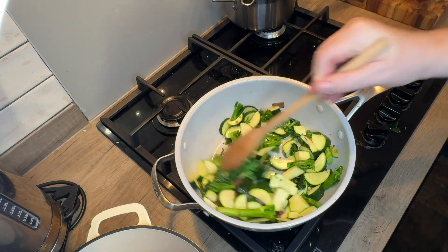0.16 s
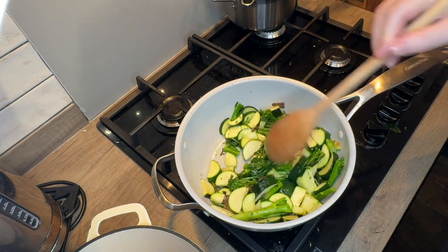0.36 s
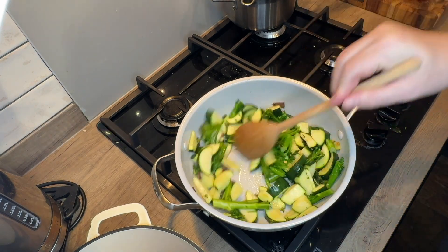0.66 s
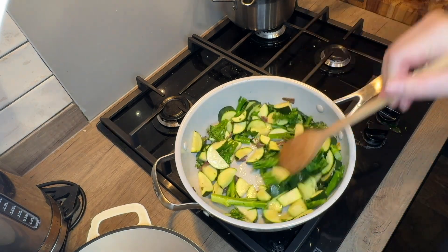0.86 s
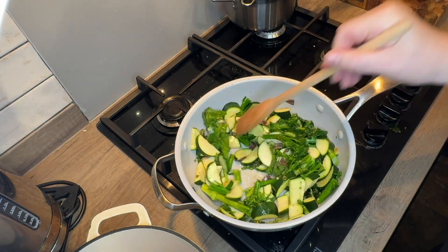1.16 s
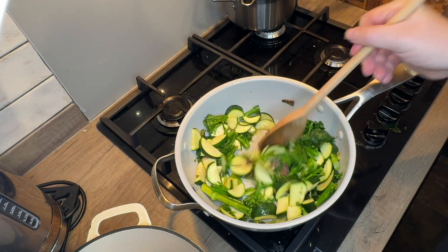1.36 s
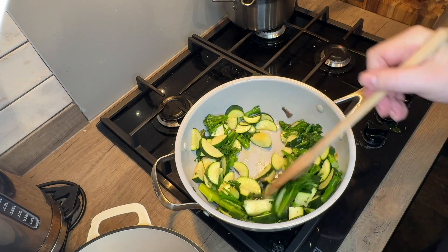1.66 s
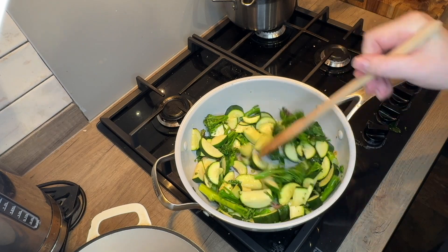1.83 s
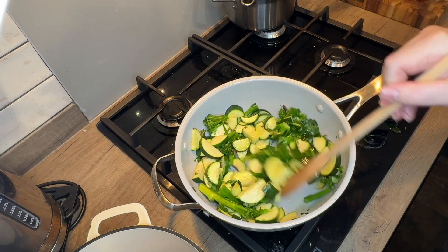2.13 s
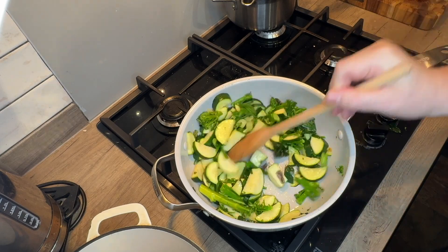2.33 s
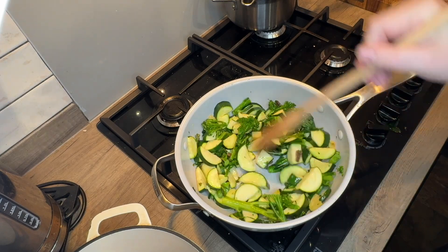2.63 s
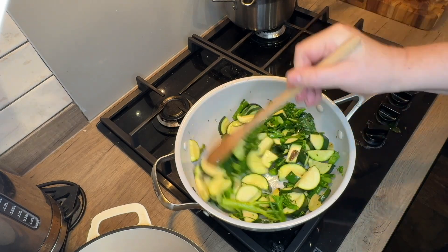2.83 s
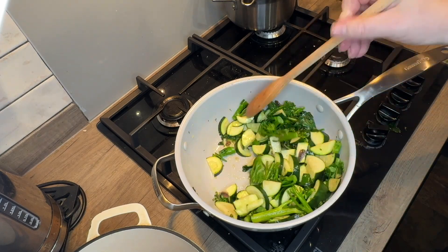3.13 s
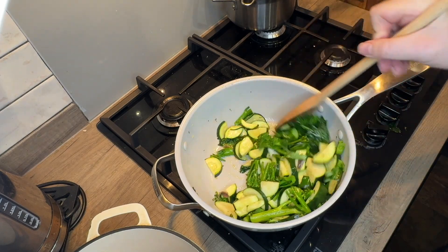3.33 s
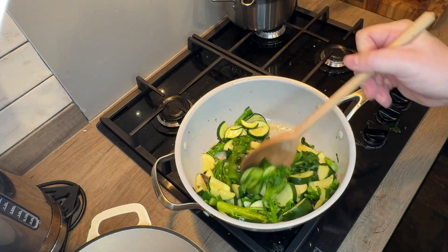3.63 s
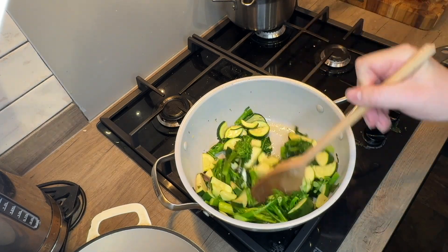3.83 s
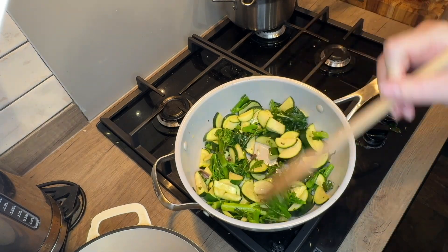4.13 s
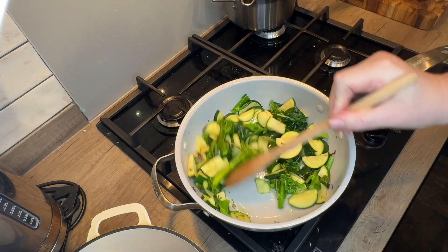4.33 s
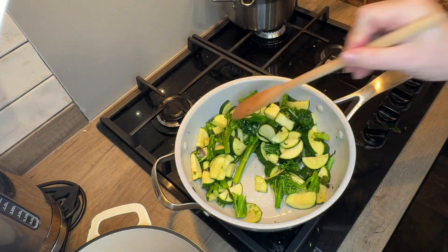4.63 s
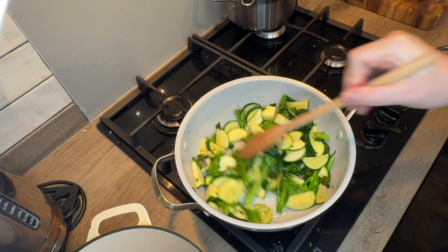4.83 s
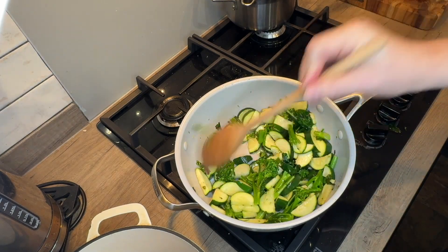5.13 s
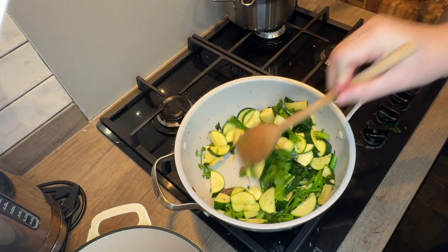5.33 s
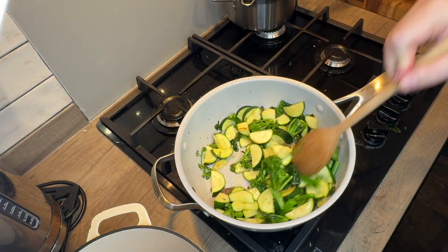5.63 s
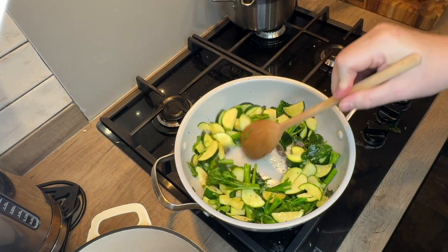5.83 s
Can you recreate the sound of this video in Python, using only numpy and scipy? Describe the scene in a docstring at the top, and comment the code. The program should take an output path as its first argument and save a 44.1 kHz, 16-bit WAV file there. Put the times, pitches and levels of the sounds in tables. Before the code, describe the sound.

A wooden spoon stirs chopped vegetables in a frying pan on a stove. Irregular hollow knocks, the strongest near one second, three seconds and just before six, mix with soft touches and small rattles. Wet pieces rustle and sizzle quietly throughout, with a few dry crackles. A low motor hum lies behind. Small hard-surfaced kitchen, short echo, close mono pickup, with steady noise held down and tails cut short.

```python
"""A wooden spoon knocks on a frying pan as it stirs chopped vegetables on a gas hob, in a small kitchen.
Knocks, soft low touches and rattles, the low ring of the bowl and the bumps on the grate are damped modes
driven by short forces. Between them the vegetables rustle and sizzle softly, as showers of tiny clicks, with
a few sharp crackles of dying noise. An appliance hums behind, two wavering sines over rumble and air.
The recorder turns down whatever stays near the steady noise and cuts the top."""
import sys
import numpy as np
from scipy import signal
from scipy.io import wavfile
from scipy.ndimage import uniform_filter1d

SR = 44100
rng = np.random.default_rng(int(sys.argv[2]) if len(sys.argv) > 2 else 0)


def bounce(signal):
    """Save signal as a 16-bit WAV file at the path given by the first command-line argument."""
    frames = np.transpose(np.atleast_2d(signal))
    limited = np.clip(frames, -1, 1)
    pcm = np.round(limited * 32767).astype(np.int16)
    wavfile.write(sys.argv[1], SR, pcm)


N = 263575
TIME = np.arange(N) / SR
HIT_TIME = TIME[:SR // 2]

# Blows of the spoon on the pan; vegetables caught under it cushion the contact and lower its cut-off.
# Each row: contact in seconds, relative strength in dB, contact cut-off in Hz, low knock and wall of the pan
# in dB re strength, favoured base pitch and tick pitch in Hz, tail in dB re the direct sound.
SPOON_BLOWS = [ (0.144, -52, 8000, -6, -4, 763, 3530, -4),
               (0.1467, -55.5, 9000, -24, -26, 800, 6400, -12.5),
               (0.968, -31, 1273, -12, -5, 850, 3000, -5.5), (2.1404, -35, 1080, 5, 9, 790, 3420, -1),
               (2.786, -46.5, 2980, 13, -34, 704, 4100, -2),
               (2.8905, -48, 4960, 2.5, -6.5, 726, 3400, -8.5), (3.174, -39.5, 8000, 6, 5.5, 920, 3930, -1),
               (3.179, -54.5, 5500, -20, 17, 750, 7040, 0.5), (3.3971, -43, 550, 9, -1.5, 766, 3200, -3.5),
               (3.8287, -49, 3670, 17, 0, 770, 4600, -1.5), (4.212, -37, 4400, 0, 1.5, 700, 3500, -0.5),
               (4.823, -60, 4500, 3, 4.5, 810, 3400, 2.5), (5.7327, -29, 1623, -11, -2, 849, 3530, -2.5)]
# Modes of spoon and pan, from low knock to wall. Each row: pitch in Hz, relative level in dB, t60 in seconds.
LOW_MODES = [(333, -12, 0.065), (369, -1, 0.013), (480, -4, 0.07), (532.5, 1.5, 0.026), (670, 7.5, 0.032)]
FLOOR_MODES = [(751.4, 1, 0.17), (794, 4, 0.022), (932, 3.1, 0.074)]
SIDE_MODES = [(1080, 3.5, 0.014), (1256, 4.5, 0.033), (1397, 2, 0.036), (1595, 4.5, 0.0065)]


def knocks(level_db=-1, graze_db=-33, graze_s=0.0038, delay_s=0.00037):
    """Each blow is a graze through the vegetables, a push, a brief skid of the wood and a dying tail."""
    # Bright modes of the contact. Each row: pitch in Hz, relative level in dB, t60 in seconds.
    clack_modes = [(1780, 6, 0.031), (2008.4, 6.5, 0.028), (2090, 5, 0.032), (2320, -0.5, 0.045),
                   (2620, -8, 0.022)]
    tick_modes = [(2945, 13.5, 0.011), (3320, 5.5, 0.033), (3430, 8.5, 0.013), (3810, 3, 0.0091),
                  (4034, 2, 0.031), (4720, 9, 0.013), (4650, 1, 0.01), (5960, 6.5, 0.019),
                  (6880, -5, 0.0026)]
    # how sharply the strike point picks out modes, in dB per squared octave
    base_focus_db, clack_focus_db, tick_focus_db = 110, 42, 75
    highest_clack_hz, clack_per_cutoff = 2500, 1.92
    bright_tick_db, focus_db_per_db, max_narrowing = -33, 2.1, 3.6
    out = np.zeros(N)
    for s, strength_db, contact_hz, knock_db, wall_db, base_hz, tick_hz, tail_db in SPOON_BLOWS:
        force = push(skid_db=-13.5, skid_t60=0.032)
        clack_db, tick_db = clack_and_tick(strength_db, contact_hz)
        # a cushioned blow clacks lower
        clack_hz = min(highest_clack_hz, clack_per_cutoff * contact_hz)
        # a dull contact favours few tick modes, a bright contact wakes more of them
        narrowing = min(from_db(focus_db_per_db * (bright_tick_db - tick_db)), max_narrowing)
        families = [
            (strength_db + knock_db, LOW_MODES),
            (strength_db, struck(FLOOR_MODES, base_hz, base_focus_db)),
            (strength_db + wall_db, SIDE_MODES),
            (clack_db, struck(clack_modes, clack_hz, clack_focus_db)),
            (tick_db, struck(tick_modes, tick_hz, tick_focus_db * narrowing))]
        for db, modes in families:
            direct = sounded(force, modes)
            gain = from_db(db + level_db) / attack_rms(direct)
            tail = from_db(tail_db) * kitchen(modes)
            add(out, s - graze_s, gain * from_db(graze_db) * direct)
            add(out, s + delay_s, gain * (direct + tail))
    return out


def touches_and_rattles(level_db=-1, tail_db=-9, focus_db=70):
    """Soft low touches, small rattles and short rings of the pan, each near one pitch."""
    # Each row: start in seconds, relative level in dB, favoured pitch in Hz.
    small_sounds = [(0.639, -52.5, 960), (1.735, -50.5, 435), (1.737, -53.5, 895), (1.853, -53, 913),
                    (2.841, -39, 723), (2.911, -44.5, 750), (3.291, -49.5, 1340), (3.387, -51, 700),
                    (3.496, -45.5, 910), (4.362, -52.5, 806), (4.724, -54.5, 1120), (4.858, -50, 810),
                    (5.338, -59, 334)]
    out = np.zeros(N)
    for s, db, hz in small_sounds:
        modes = struck(LOW_MODES + FLOOR_MODES + SIDE_MODES, hz, focus_db)
        direct = sounded(push(skid_db=-15.5, skid_t60=0.052), modes)
        gain = from_db(db + level_db) / attack_rms(direct)
        tail = from_db(tail_db) * kitchen(modes)
        add(out, s, gain * (direct + tail))
    return out


def bowl(ring_db=-21, follows_tick=0.58, follows_knock=0.26, lag_s=0.02194):
    """Just after each knock the bowl of the pan rings low, the more so the harder and heavier the contact."""
    # Low ring of the whole pan. Each row: pitch in Hz, relative level in dB, t60 in seconds.
    bowl_mode = [(311, 0, 0.52)]
    out = np.zeros(N)
    for s, strength_db, contact_hz, knock_db, *_ in SPOON_BLOWS:
        tick_db = clack_and_tick(strength_db, contact_hz)[1]
        db = ring_db + follows_tick * tick_db + follows_knock * (strength_db + knock_db)
        tone = band(ring(push(skid_db=-9, skid_t60=0.042), bowl_mode), 250, 299)
        add(out, s + lag_s, from_db(db) * peak_one(tone))
    return out


def bumps():
    """The pan bumps on its grate, and the low modes of the grate answer the shove with a soft thud."""
    # Each row: start in seconds, relative peak in dB.
    shoves = [(0.17, -48), (2.193, -46.5), (2.224, -53), (2.817, -49.5), (2.895, -48), (3.194, -48.5)]
    # Each row: pitch in Hz, relative level in dB, t60 in seconds.
    grate_modes = [(60, -4, 0.1), (107, 5, 0.29), (159, -3, 0.12), (220, 4, 0.09)]
    out = np.zeros(N)
    for s, thud_db in shoves:
        thud = band(ring(push(skid_db=-11.5, skid_t60=0.024), grate_modes), 26, 210)
        add(out, s, from_db(thud_db) * peak_one(thud))
    return out


def push(skid_db, skid_t60):
    """The force of a contact: a sharp push and a brief skid."""
    force = from_db(skid_db) * fading_noise(skid_t60)
    force[0] += 1
    return force


def clack_and_tick(strength_db, contact_hz, cushion_db_per_octave=21.5):
    """Relative dB of the two bright families; the cushion takes away what lies above its cut-off."""
    bare_db = np.array([13, 7.5])  # clack and tick of a bare contact, re strength
    centres_hz = np.array([2270, 3670])
    octaves = np.log2(centres_hz / contact_hz)
    cushion_db = 10 * np.log10(1 + from_db(cushion_db_per_octave * octaves) ** 2)
    return strength_db + bare_db - cushion_db


def struck(modes, lead_hz, focus_db):
    """Modes lose focus_db times the squared octaves from the favoured pitch."""
    return [(hz, db - focus_db * np.log2(hz / lead_hz) ** 2, t60) for hz, db, t60 in modes]


def ring(force, modes):
    """Damped sines in parallel, driven by a force; neighbours swing in opposite senses."""
    out = 0
    for k, (hz, db, t60) in enumerate(modes):
        r = from_db(-60 / (t60 * SR))  # decay per sample
        w = 2 * np.pi * hz / SR
        swing = signal.lfilter([0, np.sin(w)], [1, -2 * r * np.cos(w), r * r], force + 1e-18)
        out = out + (-1) ** k * from_db(db) * swing
    return out


def sounded(force, modes, skirt=1.253):
    """A family of modes under a force, with dark valleys on both sides; unit energy."""
    sound = band(ring(force, modes), modes[0][0] / skirt, modes[-1][0] * skirt, order=4)
    return sound / np.linalg.norm(sound)


def kitchen(modes, first_echo_s=0.0023, build_s=0.0014, blur_cycles=30):
    """The pan rattles on and the tiles echo it: a dense tail in which high modes blur together."""
    # Rattle and echo. Each row: pitch in Hz, tail level in dB, t60 in seconds.
    room = [(440, 0, 0.46), (910, 3, 0.35), (1250, 2.5, 0.39), (2260, -2.5, 0.26), (4500, 0.5, 0.23)]
    hz = np.sqrt(modes[0][0] * modes[-1][0])
    build = np.clip((HIT_TIME - first_echo_s) / build_s, 0, 1)
    echoes = fading_noise(at_hz(room, hz, axis=2)) * build
    blurred = [(mode_hz, db, min(t60, blur_cycles / mode_hz)) for mode_hz, db, t60 in modes]
    return from_db(at_hz(room, hz)) * sounded(echoes, blurred)


def crackles(level_db=4, spray_db=8):
    """Stalks and hot oil crackle: a snap and a short spray, both dying noise, each with its own brightness."""
    # Each row: start in seconds, relative peak in dB, tilt in dB per octave.
    snaps = [(0.1446, -43, 0), (1.1313, -55, 3), (1.1537, -48, -2.5), (1.251, -45, -7.5),
             (2.3687, -47.5, -11), (3.1773, -30, -5), (3.8375, -38.5, -1.5), (4.827, -49, 0),
             (5.24, -51, -13)]
    # Each row: frequency in Hz, relative level in dB per Hz before the tilt.
    snap_colour = [(1200, -8), (2800, 6), (5000, 9), (8000, 1.5), (15000, -5)]
    out = np.zeros(N)
    for s, db, tilt_db in snaps:
        colour = [(hz, band_db + tilt_db * np.log2(hz)) for hz, band_db in snap_colour]
        snap = coloured(lambda: fading_noise(t60=0.025) + from_db(spray_db) * fading_noise(t60=0.069), colour)
        add(out, s, from_db(db + level_db) * peak_one(snap))
    return out


def vegetables(rustle_gain_db=0.5, sizzle_db=-72.0, sizzle_follows=0.74):
    """Wet pieces slide over the hot pan as tiny steam bubbles burst; the sizzle swells with the stirring."""
    # How briskly the pieces turn over. Each row: time in seconds, relative rustle level in dB.
    stir = [(0.0, -63), (0.4, -64.5), (0.83, -63.5), (1.13, -62.5), (1.7, -64), (3.34, -65), (3.48, -67.5),
            (3.78, -68.5), (3.99, -65), (4.33, -63.5), (5.23, -65), (5.98, -65.5)]
    # Colours of the two textures. Each row: frequency in Hz, relative level in dB per Hz.
    rustle_colour = [(700, 0), (1000, -5.5), (1220, 0.5), (1560, -4), (2020, 0), (2430, 0.5), (3180, -2.5),
                     (4950, -6), (7000, -22.5)]
    sizzle_colour = [(4000, -2.5), (5500, 1.5), (7000, 1.5), (8800, -2), (12000, -6.5), (15800, -7.5)]
    stir_db = np.interp(TIME, *np.transpose(stir))
    swell_db = sizzle_follows * (stir_db - stir_db.mean())
    rustle = coloured(lambda: grains(per_s=12000, spread_db=2.5), rustle_colour)
    sizzle = coloured(lambda: grains(per_s=12000, spread_db=3.0), sizzle_colour)
    rustle = rustle * from_db(stir_db + rustle_gain_db + 0.1 * drift(21))
    sizzle = sizzle * from_db(sizzle_db + swell_db + 0.73 * drift(24))
    return rustle + sizzle


def grains(per_s, spread_db):
    """Random tiny clicks, a few much larger than the rest."""
    count = max(int(per_s * N / SR), 1)
    sizes = from_db(spread_db * np.minimum(rng.exponential(1, count), 5)) * rng.choice([-1, 1], count)
    return np.bincount(rng.integers(0, N, count), sizes, N)


def background(waver_rad=0.63, rumble_db=-81, throb_db=-0.2, air_db=-73):
    """A motor hums at twice the mains rate and an octave above, over low rumble and a soft rush of air."""
    # Each row: pitch in Hz, relative rms level in dB.
    hum_tones = [(99.7, -73.5), (199, -82.5)]
    # Each row: frequency in Hz, relative level in dB per Hz.
    air_colour = [(125, 0), (200, -2.5), (270, -3.5), (365, -2), (490, -3), (600, 3.5), (1200, -9)]
    hum = 0
    for hz, db in hum_tones:
        phase = 2 * np.pi * hz * TIME + waver_rad * drift(1.1)
        hum = hum + from_db(db) * np.sqrt(2) * np.sin(phase)
    rumble = band(rng.standard_normal(N), 79.0, 108)
    air = coloured(lambda: rng.standard_normal(N), air_colour)
    throb = from_db(throb_db * drift(9.3))
    return hum * throb + from_db(rumble_db) * rumble / rms(rumble) + from_db(air_db) * air


def from_db(db):
    """Decibels to gain."""
    return 10 ** (np.asarray(db) / 20)


def rms(x):
    """Root mean square."""
    return np.sqrt(np.mean(x ** 2) + 1e-24)


def attack_rms(x):
    """Root mean square of the first 10 ms."""
    return rms(x[:SR // 100])


def peak_one(x):
    """Scale a sound to a peak of 1."""
    return x / np.abs(x).max()


def at_hz(points, hz, axis=1):
    """Read a column of a table on a log-frequency axis."""
    table = np.array(points)
    return np.interp(np.log(hz), np.log(table[:, 0]), table[:, axis])


def band(x, low_hz, high_hz, order=2):
    """Causal band-pass."""
    sos = signal.butter(order, [low_hz, min(high_hz, .45 * SR)], "band", fs=SR, output="sos")
    return signal.sosfilt(sos, x + 1e-18)


def add(out, s, sound):
    """Mix a sound in at time s."""
    start = max(round(s * SR), 0)
    out[start:start + len(sound)] += sound[:N - start]


def drift(rate_hz, step=40):
    """Slow random wander of rms 1: noise through two equal poles, computed every 40 samples."""
    r = np.exp(-2 * np.pi * step * rate_hz / SR)
    noise = rng.standard_normal(N // step + 2002)
    slow = signal.lfilter([1], [1, -2 * r, r * r], noise)[2000:]  # drop the run-in
    return np.interp(np.arange(N) / step, np.arange(len(slow)), slow / rms(slow))


def bands_of(table):
    """(low, centre, high) Hz of third-octave bands across a table."""
    low, high = table[0][0], table[-1][0]
    edges = np.geomspace(low, high, round(3 * np.log2(high / low)) + 1)
    return [(a, np.sqrt(a * b), b) for a, b in zip(edges, edges[1:]) if b < .45 * SR]


def coloured(source, spectrum):
    """Each band takes a fresh draw of the source, at the level of the spectrum; rms 1."""
    out = sum(from_db(at_hz(spectrum, hz)) * band(source(), low, high) for low, hz, high in bands_of(spectrum))
    return out / rms(out)


def fading_noise(t60):
    """A dying burst of noise with unit energy."""
    burst = rng.standard_normal(len(HIT_TIME)) * from_db(-60 * HIT_TIME / t60)
    return burst / np.linalg.norm(burst)


def suppress_noise(x, most_db=9, clear_db=6.5, knee_db=7, size=512):
    """Each band is turned down unless it stands clear of its median level, so tails end early and in lumps."""
    overlap = 3 * size // 4
    spectra = signal.stft(x, nperseg=size, noverlap=overlap)[2]
    power = uniform_filter1d(np.abs(spectra) ** 2, size=5, axis=-2)  # smooth over frequency
    power = uniform_filter1d(power, size=4, axis=-1)  # and over time
    level_db = 10 * np.log10(np.maximum(power, 1e-20))
    above_db = level_db - np.median(level_db, axis=-1, keepdims=True) - clear_db
    closed = np.clip(0.5 - above_db / knee_db, 0, 1)
    return signal.istft(spectra * from_db(-most_db * closed), nperseg=size, noverlap=overlap)[1][:, :N]


def scene(steady_db=9):
    """The pan, its crackles, and the steady sounds of vegetables and kitchen, in one channel."""
    pan = knocks() + touches_and_rattles() + bowl() + bumps()
    steady = vegetables() + background()
    return (pan + crackles() + from_db(steady_db) * steady)[None]


def record(dry, cutoff_hz=15850):
    """The recorder suppresses steady noise and cuts the top steeply."""
    top_cut = signal.ellip(10, .1, 70, cutoff_hz, fs=SR, output="sos")
    return signal.sosfilt(top_cut, suppress_noise(dry))


dry = scene()
out = record(dry)
bounce(out)
```